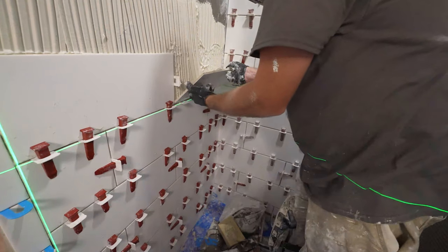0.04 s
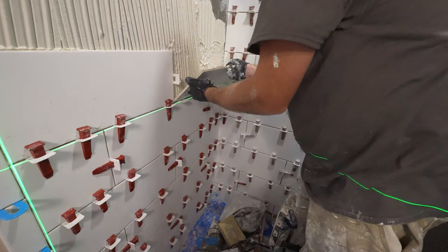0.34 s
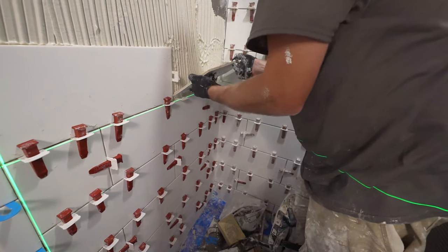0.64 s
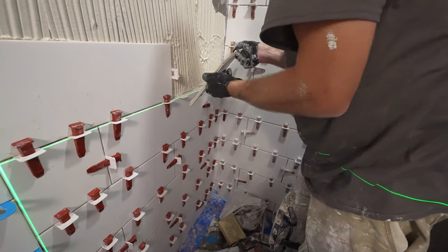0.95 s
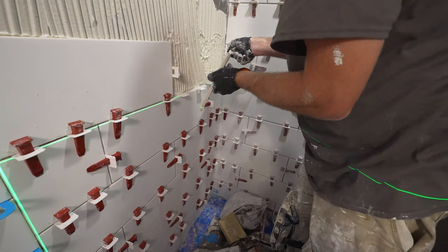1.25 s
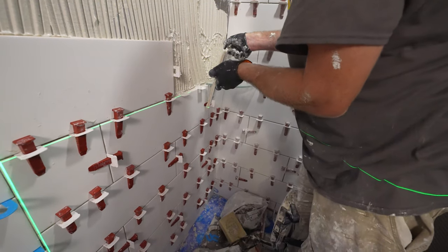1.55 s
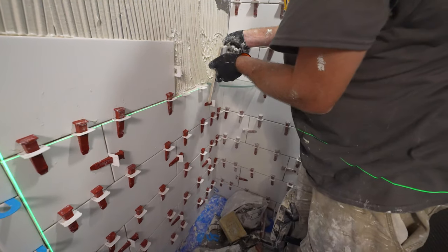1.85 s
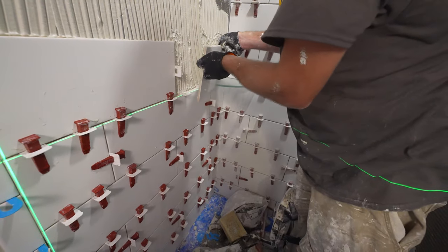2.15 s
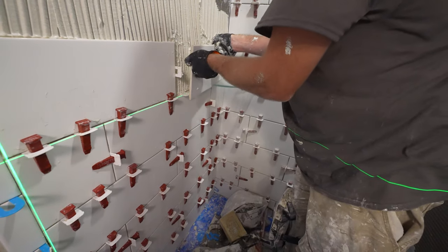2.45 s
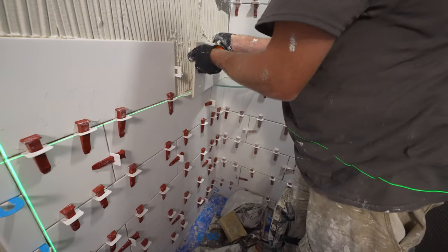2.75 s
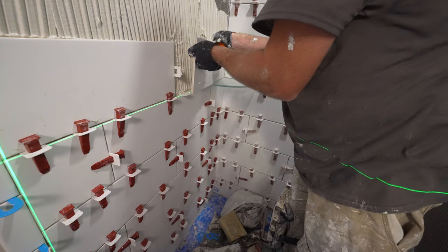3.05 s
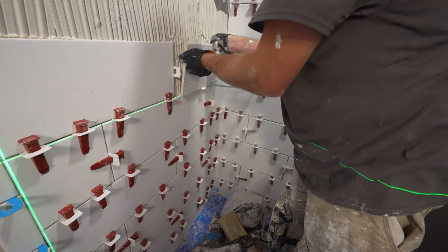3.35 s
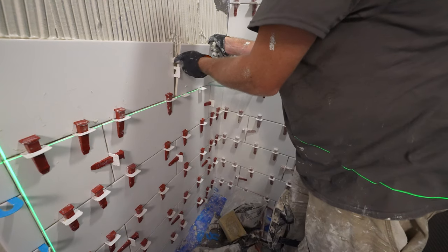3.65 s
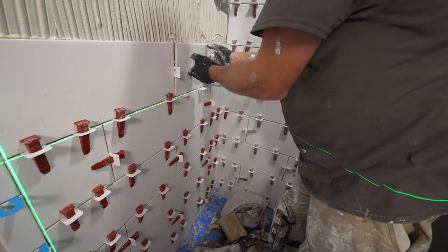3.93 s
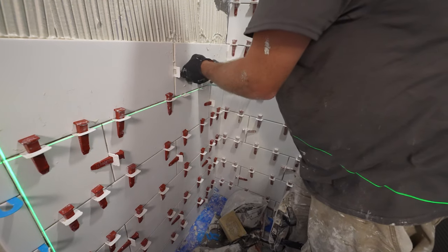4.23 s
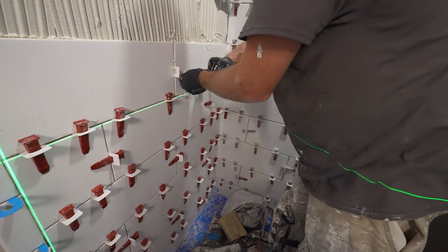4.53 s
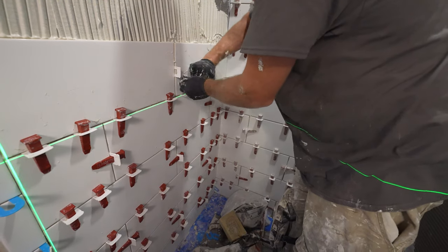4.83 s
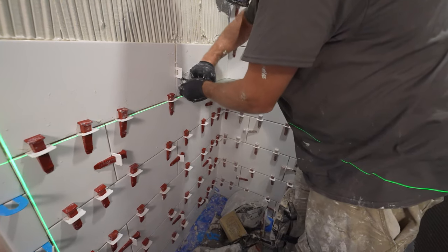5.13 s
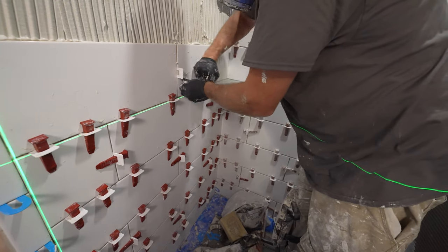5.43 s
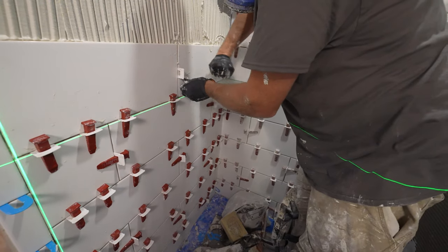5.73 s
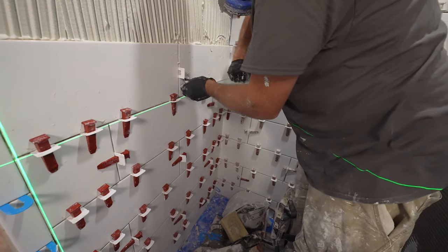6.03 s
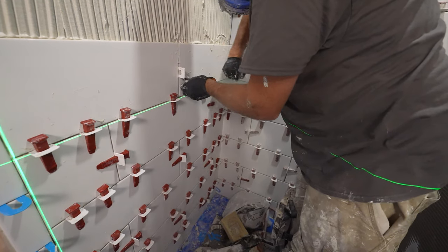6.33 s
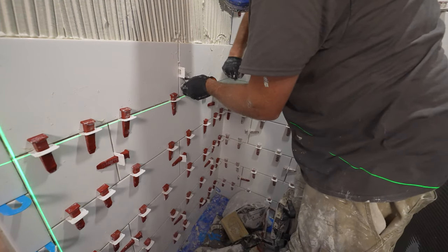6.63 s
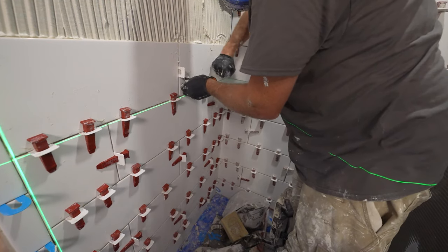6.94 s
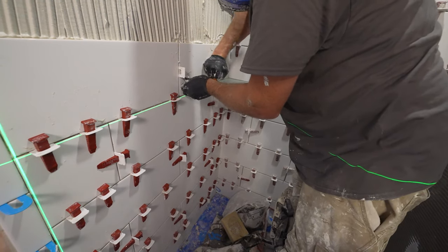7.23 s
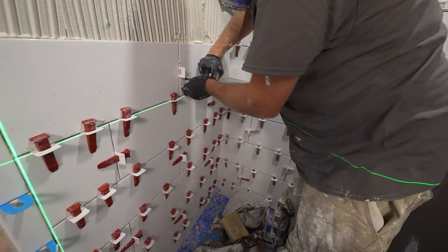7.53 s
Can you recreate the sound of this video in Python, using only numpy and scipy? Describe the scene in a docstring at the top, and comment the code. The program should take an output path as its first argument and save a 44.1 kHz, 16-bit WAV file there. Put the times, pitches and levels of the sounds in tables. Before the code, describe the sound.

A ceramic tile clacks, scrapes and clicks into wall mortar, then a gloved fist beds it with nine even, booming knocks.

```python
"""A hollow clack over faint hiss: a ceramic tile meets combed mortar in a small tiled bathroom.
Sand grains scrape and crack as it slides into place; its edge clicks and squeaks against the next
tile and sets the glaze ringing, more briefly once the mortar grips. Then a gloved fist beds it
with nine even knocks that boom in the wall and overload the microphone."""
import sys
import numpy as np
from scipy import signal
from scipy.fft import rfft, irfft
from scipy.io import wavfile
from scipy.ndimage import uniform_filter1d

SR = 44100
rng = np.random.default_rng(int(sys.argv[2]) if len(sys.argv) > 2 else 0)


def store_pcm(level_fs):
    """Save levels as 16-bit WAV."""
    pcm = np.round(np.clip(level_fs, -1, 1) * 32767).astype(np.int16)
    wavfile.write(sys.argv[1], SR, np.atleast_2d(pcm).T)


N = 343098


def amp(db):
    """Decibels to gain."""
    return 10 ** (np.asarray(db) / 20)


def unit(x):
    """Scales to energy 1."""
    return x / (np.linalg.norm(x) + 1e-20)


def curve_at(points, hz):
    """Reads a curve on a log-frequency axis."""
    points_hz, values = np.transpose(points)
    return np.interp(np.log(hz + 1), np.log(points_hz), values)


def add(mix, start_s, sound):
    """Mixes a sound in at its start time."""
    part = mix[max(round(start_s * SR), 0):][:len(sound)]
    part += sound[:len(part)]


def convolve(x, response):
    """Convolves and keeps the length."""
    return signal.fftconvolve(x, response)[:len(x)]


def colour(x, eq, size=2048):
    """Plays x through an EQ curve: a minimum-phase filter of energy 1."""
    log_gain = np.log(amp(curve_at(eq, abs(np.fft.fftfreq(size, 1 / SR)))))
    spectrum = np.exp(np.conj(signal.hilbert(log_gain)))
    return convolve(x, unit(np.fft.ifft(spectrum).real))


def wobble(n, size):
    """Random drift smoothed over size samples, rms 1."""
    return np.sqrt(n) * unit(uniform_filter1d(rng.standard_normal(n), size))


def ring(x, modes, uneven_db=0, detune=0, size=10000):
    """x excites damped modes; the place of contact varies their strength and pitch."""
    t = np.arange(size) / SR
    response = np.zeros(size)
    for hz, db, t60 in modes:
        level_draw, pitch_draw = rng.standard_normal(2)
        tone = np.sin(2 * np.pi * hz * (1 + detune * pitch_draw) * t)
        response += amp(db + uneven_db * level_draw) * unit(amp(-60 * t / t60) * tone)
    return convolve(x, unit(response))


def damped(modes, t60_s):
    """Gives all modes one decay time."""
    return [(hz, db, t60_s) for hz, db in modes]


def crunch(decay_ms, rise_ms, size=2048):
    """One contact: a short burst of crushed grains with an even spectrum."""
    t_ms = 1000 * np.arange(size) / SR
    fade = np.exp(-t_ms / decay_ms) * (1 - np.exp(-t_ms / rise_ms))
    spectrum = rfft(rng.standard_normal(size) * fade)
    flattened = spectrum / np.sqrt(uniform_filter1d(abs(spectrum) ** 2, size // 16))
    return unit(irfft(flattened) * np.sqrt(fade)) * np.linalg.norm(fade)


def grains(n, per_s, spread_db):
    """Sparse slips of uneven size, rms 1."""
    slips = rng.random(n) < per_s / SR
    sign = rng.choice([-1., 1.], n)
    strength = amp(spread_db * np.minimum(rng.exponential(1, n), np.pi))
    return np.sqrt(n) * unit(slips * sign * strength)


def push(length_s, peak_share, catch_s=0.0042, swell_db=7.5, ease_db=20):
    """Envelope in dB of one push: it catches, swells until peak_share of its length, then eases off."""
    t = np.arange(1, length_s * SR) / SR
    swell = np.interp(t, [0, peak_share * length_s, length_s], [-swell_db, 0, -ease_db])
    edges = np.clip(np.minimum(t, length_s - t) / catch_s, 1e-4, 1)
    return swell + 20 * np.log10(edges)


# Dark tone of the background: freq_hz, gain_db
HISS_EQ = [(25, -19.5), (60, 0.5), (160, -2), (300, -5), (550, -2), (900, -7), (1500, -22), (3000, -22.5),
           (6000, -35), (10000, -39), (16000, -62.5)]
# Fader ride of the background: time_s, level_db
HISS_FADER = [(0, -66.5), (.6, -72), (2.7, -67), (4.601, -66.5), (5.001, -77), (7.78, -77.5)]
def hiss(treble_db_per_db=0.16, waver_db=1, crossover_hz=1500):
    """Faint, wavering room tone that sinks and darkens as the knocking starts."""
    level_db = np.interp(np.arange(N) / SR, *np.transpose(HISS_FADER))
    air = colour(rng.standard_normal(N), HISS_EQ)
    low = signal.lfilter(*signal.butter(2, crossover_hz, fs=SR), air)
    high = signal.lfilter(*signal.butter(2, crossover_hz, "high", fs=SR), air)
    treble = amp(treble_db_per_db * (level_db - level_db.max()))
    return amp(level_db + waver_db * wobble(N, size=11000)) * (low - treble * high)


# Reverb time of the bathroom: freq_hz, t60_s
ROOM_DECAY = [(100, 0.43), (400, 0.23), (1100, 0.25), (3000, 0.14), (7500, 0.099), (15000, 0.21)]
def room(x, wet_db, late_db, late_t60_s=0.55, gap_s=0.0014, size=24000):
    """Direct sound, dense reflections off tiled walls and a faint, dark tail from the rooms beyond."""
    hz, t, noise = signal.stft(rng.standard_normal(size), SR, nperseg=256)
    near = amp(-60 * t / curve_at(ROOM_DECAY, hz)[:, None])
    far = amp(late_db - 60 * t / late_t60_s) / np.hypot(1, hz[:, None] / 4000)
    tail = signal.istft(noise * np.hypot(near, far), SR, nperseg=256)[1]
    tail *= np.clip(np.arange(len(tail)) / SR / gap_s - .5, 0, 1)  # pre-delay
    return x + amp(wet_db) * convolve(x, unit(tail))


# Tone of raspy grit, dull mortar and bright glaze: freq_hz, gain_db
GRIT_EQ = [(600, -13.5), (1300, 2), (1750, 2), (2200, 8.5), (2900, 3.5), (3600, -3), (4500, -20.5),
           (6500, -19), (9000, -49.5), (12500, -42.5), (16000, -63.5)]
MORTAR_EQ = [(40, -21.5), (110, -4), (200, 1.5), (330, -2), (500, 0), (780, 0), (1050, 0.5), (1500, -4.5),
             (3000, -58)]
GLAZE_EQ = [(1200, -28.5), (2500, 21.5), (4000, 9), (6500, -6), (10000, -21.5), (12500, -46.5),
            (16000, -46)]
# Low and high resonances of the tile lying in wet mortar: pitch_hz, level_db
BED_LOW_MODES = [(225, 0.5), (290, -7), (450, -4), (520, -2.5), (690, -8), (790, -6.5), (1130, -4)]
BED_HIGH_MODES = [(1420, 0.5), (1790, -10), (2050, -12.5), (2300, -12), (2560, 1.5), (2950, 2), (3250, -4),
                  (3650, -6)]
# Free ringing of the tile: pitch_hz, click_level_db, squeak_level_db, t60_s
TILE_MODES = [(1750, 1, 1, 0.3), (1832, 6.5, 10, 0.23), (1860, 11.5, 8, .14), (2070, 11, -13, .05),
              (2440, 2, -8.5, .08), (3310, 9, -13, 0.086), (3720, 9.5, 11, 0.17), (3756, 8, 12, .1),
              (6670, 8, -6.5, 0.091), (7220, -8.5, -26, 0.12), (7500, -14.5, -22, .12),
              (9523, -3, -19.5, 0.08), (10450, -12, -28.5, .13), (14100, -19.5, -28, 0.11)]
def tile(forces, start_s, grit_db, mortar_db, glaze_db, ring_db):
    """Three forces sound as crushed grit, the dull mortar bed and the bright, ringing glaze."""
    grit, mortar, glaze = forces
    # As the tile is pressed home, the mortar's grip thins the bass and shortens the ring.
    grip_span_s = [3, 3.65]
    cut_hz = np.interp(start_s, grip_span_s, [50, 305])
    ring_share = np.interp(start_s, grip_span_s, [1, 0.49])
    mortar = signal.lfilter(*signal.butter(2, cut_hz, "high", fs=SR), mortar)
    bed_high = ring(grit, damped(BED_HIGH_MODES, t60_s=0.035 * ring_share), uneven_db=2.5, detune=0.027)
    bed_low = ring(mortar, damped(BED_LOW_MODES, t60_s=0.055), uneven_db=2, detune=0.049)
    gritty = amp(-3) * colour(grit, GRIT_EQ) + amp(-9.5) * bed_high
    dull = amp(-4) * colour(mortar, MORTAR_EQ) + amp(-10.5) * bed_low
    bright = colour(glaze, GLAZE_EQ)
    modes = [(hz, db, t60 * ring_share) for hz, db, _, t60 in TILE_MODES]
    ringing = ring(glaze, modes, uneven_db=2, detune=0.004)
    return amp(grit_db) * gritty + amp(mortar_db) * dull + amp(glaze_db) * bright + amp(ring_db) * ringing


# Sprinkles of sand, under the slide and then the knocks: start_s, end_s, ticks_per_s, level_db
SAND_SPANS = [(1.506, 3.8, 5, -57.5), (4.906, 7.6, 4, -63)]
def loose_sand(spread_db=5, tail=6000):
    """Loose grains crack behind the tile at random moments."""
    out = np.zeros(N)
    for start_s, end_s, per_s, db in SAND_SPANS:
        n = round((end_s - start_s) * SR)
        cracking = rng.random(n) < per_s / SR
        cracks = cracking * amp(db + spread_db * rng.uniform(-1, 1, n))
        force = convolve(np.pad(cracks, (0, tail)), crunch(decay_ms=1.7, rise_ms=0.49))
        ticks = tile([force] * 3, start_s, grit_db=-2, mortar_db=-11.5, glaze_db=-7, ring_db=-18)
        add(out, start_s, ticks)
    return room(out, wet_db=-19.5, late_db=-28)


# Pushes on the tile: sliding strokes, and two late rows where the mortar squishes after a blow: start_s,
# length_s, peak_share, grit_db, mortar_vs_grit_db, glaze_vs_grit_db
PUSH_STROKES = [(0.517, 0.15, 0.38, -59, 1, -20), (1.329, 0.11, 0.12, -60, 9, -42),
                (1.403, 0.058, 0.097, -53.5, 13.5, -45), (1.547, 0.21, 0.61, -56, 9, -20),
                (1.725, 0.18, 0.33, -55, 4.5, -38), (1.893, 0.105, 0.335, -58.5, 4, -28),
                (1.967, 0.023, .3, -49.5, 4, -15), (1.994, 0.054, 0.95, -41.5, -8, -12.5),
                (2.036, 0.049, 0.066, -51, 9.5, -26), (2.116, 0.12, 0.37, -48.5, -0.5, -7.5),
                (2.416, 0.06, 0.47, -56, 6.5, -18), (2.481, 0.077, 0.068, -43.5, 0, -11.5),
                (2.748, 0.036, 0.49, -59.5, 3.5, -9), (2.794, 0.13, .35, -54, 9, -10),
                (2.997, 0.048, 0.72, -59.5, 3, -26), (3.492, 0.35, 0.11, -63, 7.5, -10),
                (3.808, 0.032, 0.37, -47.5, 4, -17), (3.85, 0.12, 0.49, -56, 3, -26),
                (4.164, 0.0448, 0.53, -44.5, 0, -19.5), (5.522, 0.11, 0.08, -59.5, 9, -25),
                (7.512, 0.18, 0.089, -69.5, 15.5, -32)]
def scrapes(mortar_follows=0.72, tail=6000):
    """Sand catches and slips in clumps under each push; soft mortar follows the push less than grit."""
    out = np.zeros(N)
    for start_s, length_s, peak_share, db, mortar_db, glaze_db in PUSH_STROKES:
        effort_db = push(length_s, peak_share)
        n = len(effort_db)
        clumps = amp(2.5 * wobble(n, size=220))
        slips = np.sqrt(n) * unit(grains(n, per_s=1700, spread_db=4) * clumps)
        levels = amp(db) * amp([effort_db, mortar_db + mortar_follows * effort_db, glaze_db + effort_db])
        forces = np.pad(levels * slips, ((0, 0), (0, tail)))
        add(out, start_s, tile(forces, start_s, grit_db=-4.5, mortar_db=-3.5, glaze_db=4, ring_db=-3.5))
    return room(out, wet_db=-5.5, late_db=-38)


# Edge chattering on edge: start_s, length_s, peak_share, level_db
EDGE_RUBS = [(3.315, 0.034, .8, -40.5), (3.347, 0.062, 0.12, -40.5)]
def squeaks(flutter_db=2, flutter_hz=28):
    """Stick and slip keep the tile's modes singing, fluttering in level and pitch over a gritty rasp."""
    out = np.zeros(N)
    for start_s, length_s, peak_share, db in EDGE_RUBS:
        effort_db = push(length_s, peak_share)
        n = len(effort_db)
        song = np.zeros(n)
        for hz, _, mode_db, _ in TILE_MODES:
            cycles = np.cumsum(hz + flutter_hz * wobble(n, size=140)) / SR
            song += amp(mode_db + flutter_db * wobble(n, size=70)) * np.sin(2 * np.pi * cycles)
        slips = grains(n, per_s=2900, spread_db=17.5)
        rasp = amp(-9) * colour(slips, GRIT_EQ) + amp(-18) * colour(slips, GLAZE_EQ)
        add(out, start_s, amp(db + effort_db) * (np.sqrt(n) * unit(song) + rasp))
    return room(out, wet_db=-6, late_db=-20)


# Edge hits: start_s, grit_db, mortar_vs_grit_db, glaze_vs_grit_db
EDGE_HITS = [(0.27, -32, -14, -22), (0.2758, -43, 5, -35), (1.259, -48.5, 8.5, -38.5),
             (1.2632, -50, 4, -35), (1.409, -43, -11, -43.5), (1.729, -43, -2, -28),
             (1.929, -47.5, -3, -15), (1.9958, -41.5, -3, -14), (2.0396, -39, 4.5, -12),
             (2.1225, -53, 9.5, -10), (2.3645, -54, 1.5, -8), (2.4517, -38.5, -2, -20),
             (2.5324, -40.5, -37, -25), (3.157, -45, -0.5, -11), (3.2193, -52, 4.5, -9),
             (3.2849, -39, 1.5, -12.5), (3.4236, -47.5, 3, -8), (3.456, -43.5, -3.5, -11),
             (3.4925, -44, 5.5, -12), (3.6783, -42, 1.5, -17), (3.7425, -45, -19.5, -25),
             (3.8133, -38.5, -27, -40), (3.8909, -37, -4, -31), (3.931, -34, -1.5, -18.5),
             (4.1642, -35.5, -4.5, -30), (4.182, -33, -5.5, -34), (4.1983, -32.5, -7.5, -17),
             (4.6975, -35.5, -18, -22), (4.7576, -34.5, -7, -13.5), (5.8599, -39.5, 0.5, -13.5),
             (6.216, -45.5, 1, -15)]
# Hollow clack as the tile first meets the wall: pitch_hz, level_db
CLACK_MODES = [(255, -4), (440, -5), (500, 0), (595, 4), (785, -8.5), (1690, -4), (1830, -2), (2600, -35),
               (3230, -7), (3450, -10)]
def clicks(clack_s=0.271, tail=9000):
    """The tile lands with a clack, and its edge bumps the wall, its neighbour and the spacers."""
    out = np.zeros(N)
    for start_s, db, mortar_db, glaze_db in EDGE_HITS:
        bump = np.pad(crunch(decay_ms=3.45, rise_ms=0.94), (0, tail))
        forces = amp([[db], [db + mortar_db], [db + glaze_db]]) * bump
        add(out, start_s, tile(forces, start_s, grit_db=-4.5, mortar_db=0.5, glaze_db=-3.5, ring_db=1.5))
    landing = np.pad(crunch(decay_ms=3.2, rise_ms=0.48), (0, tail))
    add(out, clack_s, amp(-33.5) * ring(landing, damped(CLACK_MODES, t60_s=0.085)))
    return room(out, wet_db=-4.5, late_db=-31)


# Low modes of wall and room under a blow: pitch_hz, level_db, t60_s
WALL_MODES = [(54.9, -42.5, 0.77), (74.94, -37.5, 0.48), (96, -37, 0.18), (114.1, -24, 0.12),
              (150.3, -17, 0.09), (163.1, -25, 0.27), (206.7, -26.5, 0.16), (221.3, -24.5, 0.059)]
def wall(t, boom_db, boom_hz=160.3, boom_width_hz=29, fade_s=0.19, spread_s=0.0031):
    """The wall swings after a blow; boom_db is how far the spot struck lifts or dips its boom band."""
    swing = np.zeros(len(t))
    for hz, db, t60 in WALL_MODES:
        lift_db = boom_db * np.exp(-((hz - boom_hz) / boom_width_hz) ** 2)
        swing -= amp(db + lift_db - 60 * t / t60) * np.cos(2 * np.pi * hz * t)
    swing *= 1 - np.exp(-t / spread_s)  # the bending wave takes a moment to spread
    return swing * amp(-9 * (t / fade_s) ** 3)  # the boom's tail is faded out quickly after about 0.2 s


# Tone of the glove's slap and the tile's tick: freq_hz, gain_db
SLAP_EQ = [(100, -23.5), (220, 7.5), (300, -10.5), (400, 0), (560, 0.5), (800, -8), (1200, -9.5),
           (1700, -16), (3000, -21.5), (6000, -26.5), (15000, -54.5)]
TICK_EQ = [(500, 10.5), (1300, 2.5), (2600, -1.5), (4000, 4), (5300, -9), (7500, -10.5), (10000, -19),
           (14000, -24), (16000, -33)]
# The bedded tile's own knock: pitch_hz, level_db, t60_s
KNOCK_MODES = [(350, -2, 0.11), (398, 1, 0.12), (432, -3, 0.11), (518, 0.5, 0.1), (578, -4.5, 0.12),
               (674, -6, 0.1), (755, -11, 0.1), (948, -10.5, 0.15)]
# Fist blows, one with a bounce: start_s, thump_db, boom_vs_thump_db, contact_ms, slap_db, tick_db
FIST_BLOWS = [(4.7509, 0, -1, 1.38, -43.5, -42.5), (5.1127, 2.5, 0, 1.07, -39, -41.5),
              (5.4482, 4, 1, 0.82, -36, -34), (5.8328, 0, -1, 0.74, -40.5, -43.5),
              (6.1712, 0.5, -1, 0.54, -37.5, -35.5), (6.5058, 1, -4, 1.14, -39, -42),
              (6.5141, -26, 2, 0.83, -40, -37), (6.8436, 2, -7.5, 0.78, -39, -36),
              (7.1627, 0.5, 0, 0.5, -40.5, -42), (7.4898, 1, 0.5, 0.59, -37, -51)]
def knocks(size=26000):
    """A soft fist sets the wall booming; the glove slaps the tile, which ticks against the spacers."""
    t, out = np.arange(size) / SR, np.zeros(N)
    for start_s, thump_db, boom_db, contact_ms, slap_db, tick_db in FIST_BLOWS:
        press = t * np.exp(-1000 * t / contact_ms)
        thump = amp(thump_db) * convolve(wall(t, boom_db), press / press.sum())
        add(out, start_s, room(thump, wet_db=-13, late_db=-40))
        glove = amp(slap_db) * np.pad(crunch(decay_ms=5.95, rise_ms=1.39), (0, size))[:size]
        slap = colour(glove, SLAP_EQ) + amp(-9.5) * ring(glove, KNOCK_MODES, uneven_db=3.5, detune=0.018)
        snap = np.pad(crunch(decay_ms=1.36, rise_ms=0.31), (0, size))[:size]
        tick = amp(tick_db) * colour(snap, TICK_EQ)
        add(out, start_s, amp(2.5) * room(slap, wet_db=4, late_db=-19))
        add(out, start_s, amp(9.5) * room(tick, wet_db=-10.5, late_db=-15.5))
    return out


def scene():
    """All layers at one microphone."""
    return (clicks() + loose_sand() + scrapes() + squeaks() + knocks() + hiss())[None]


def record(dry, ceiling_db=-26.5, low_cut_hz=18, high_cut_hz=15900):
    """The knocks clip the input; a low cut tilts their flat tops and a steep high cut trims the treble."""
    clipped = np.clip(dry, -amp(ceiling_db), amp(ceiling_db))
    tilted = signal.lfilter(*signal.butter(1, low_cut_hz, "high", fs=SR), clipped)
    high_cut = signal.firwin(255, high_cut_hz, window=("kaiser", 8), fs=SR)
    return signal.oaconvolve(tilted, high_cut[None], "same")


dry = scene()
out = record(dry)
store_pcm(out)
```